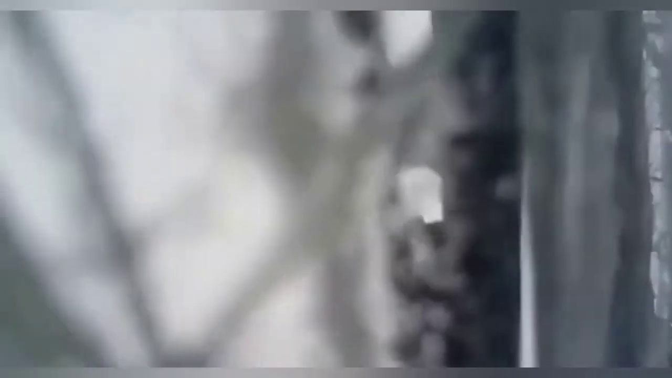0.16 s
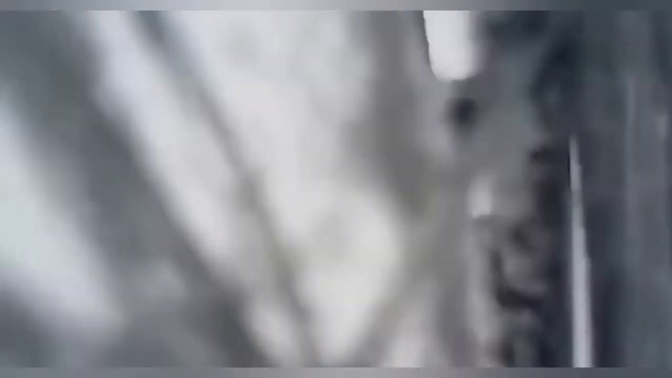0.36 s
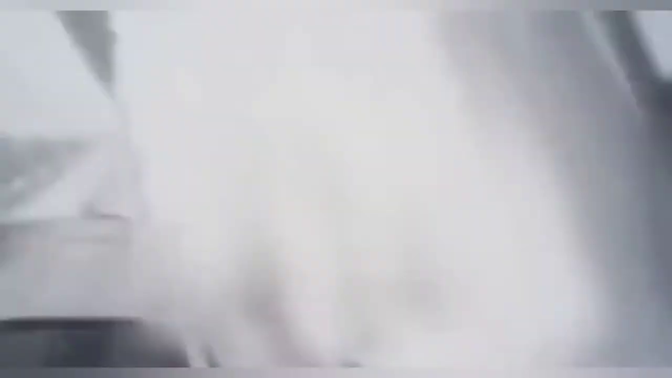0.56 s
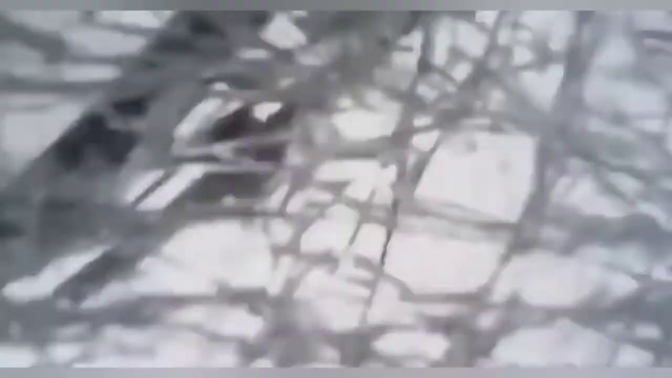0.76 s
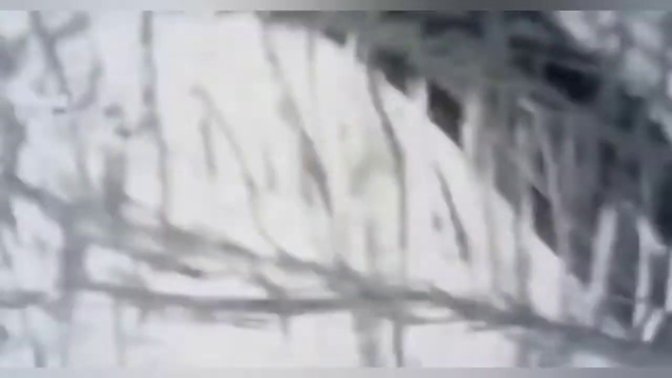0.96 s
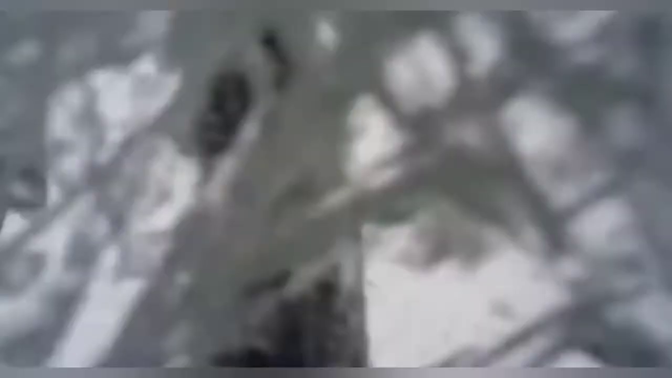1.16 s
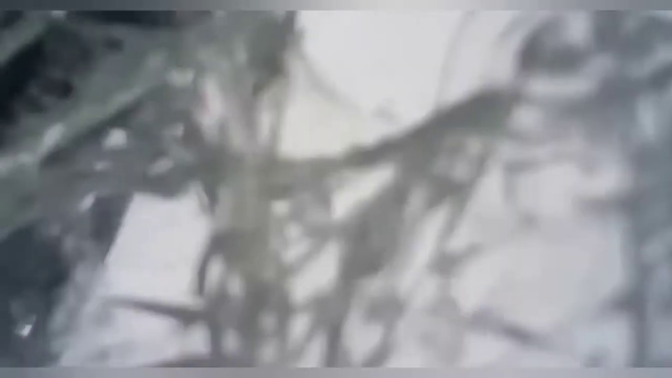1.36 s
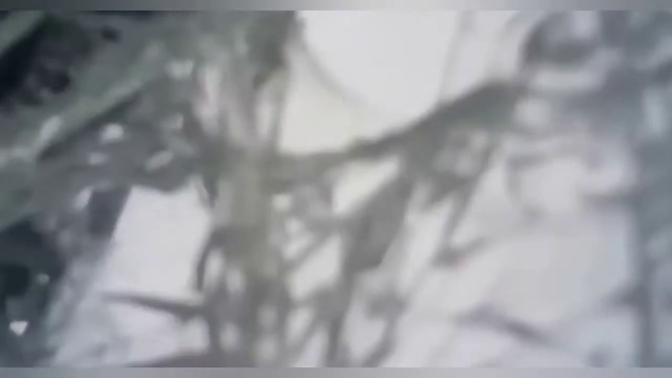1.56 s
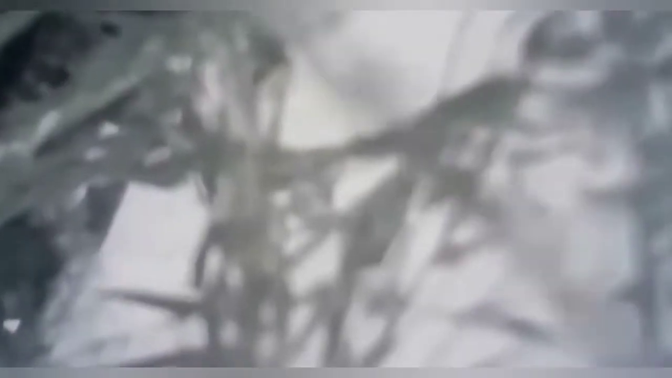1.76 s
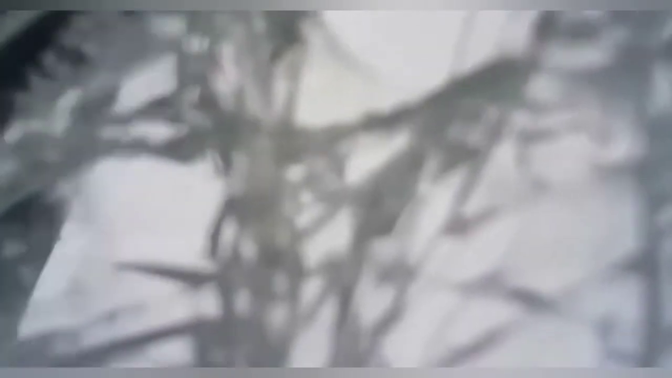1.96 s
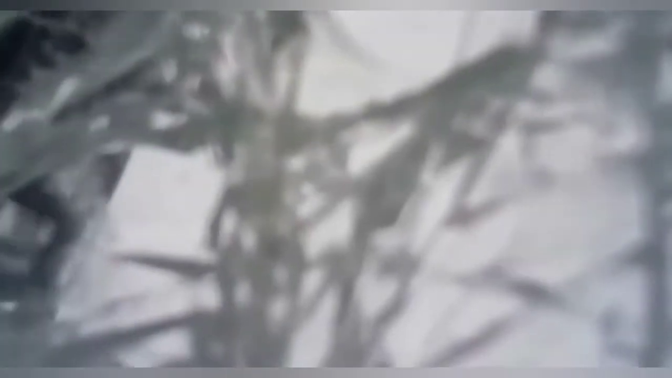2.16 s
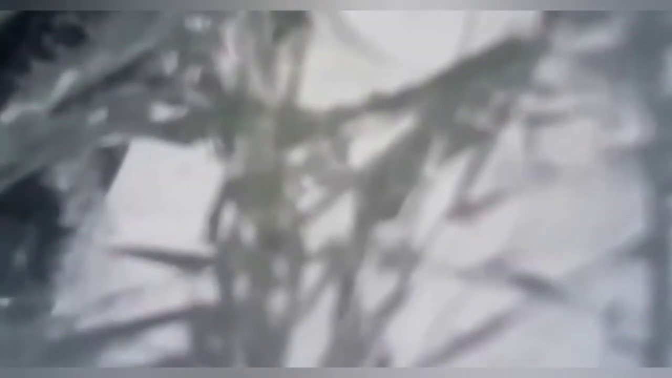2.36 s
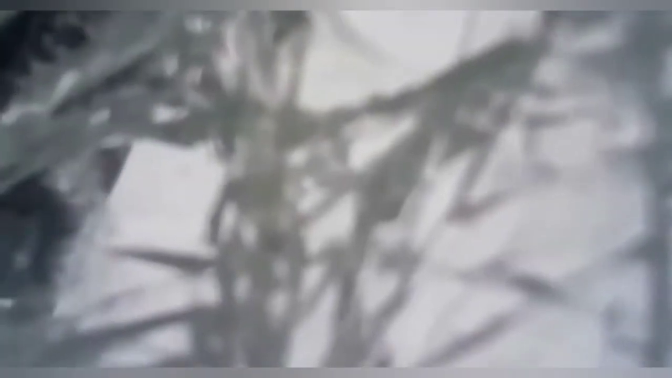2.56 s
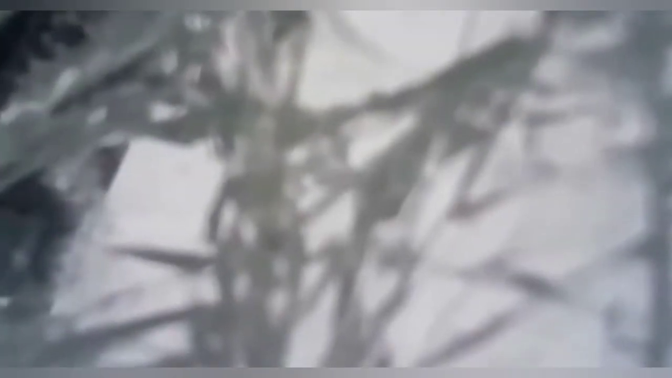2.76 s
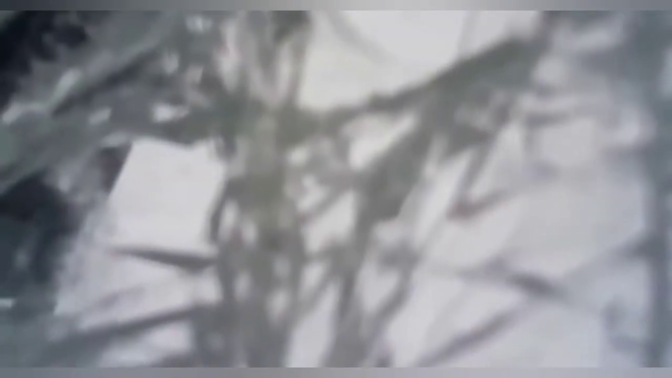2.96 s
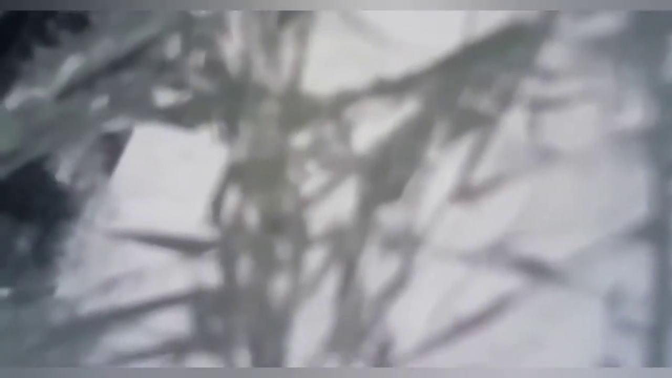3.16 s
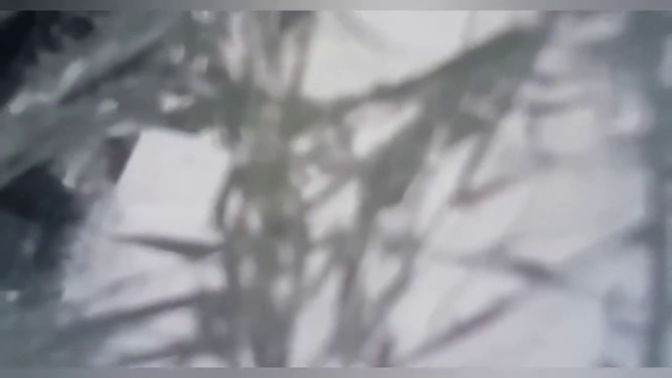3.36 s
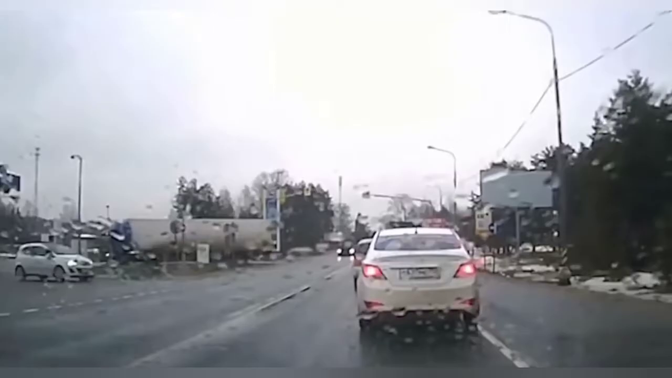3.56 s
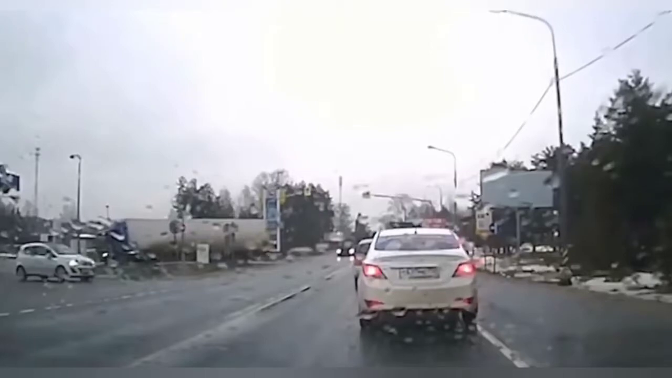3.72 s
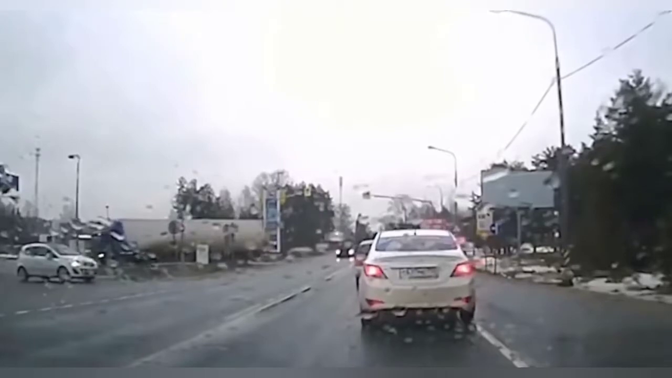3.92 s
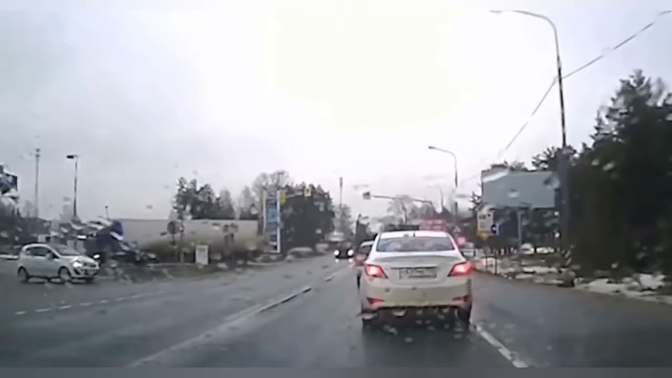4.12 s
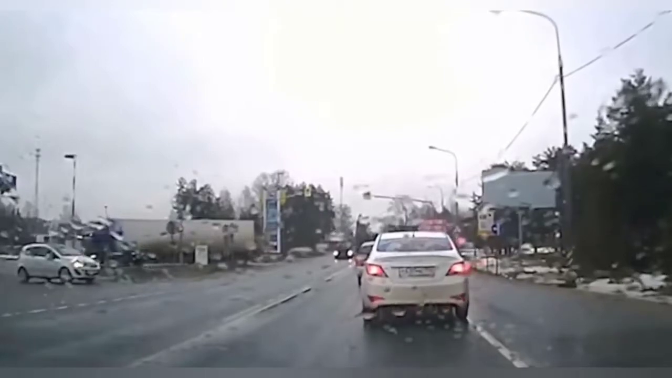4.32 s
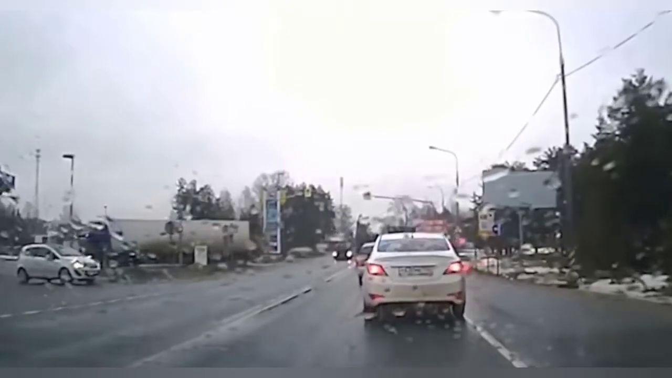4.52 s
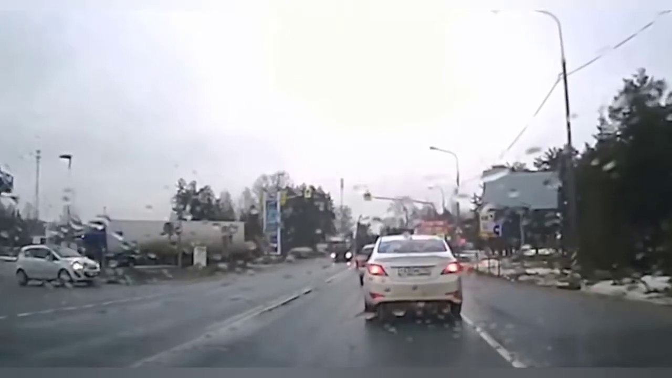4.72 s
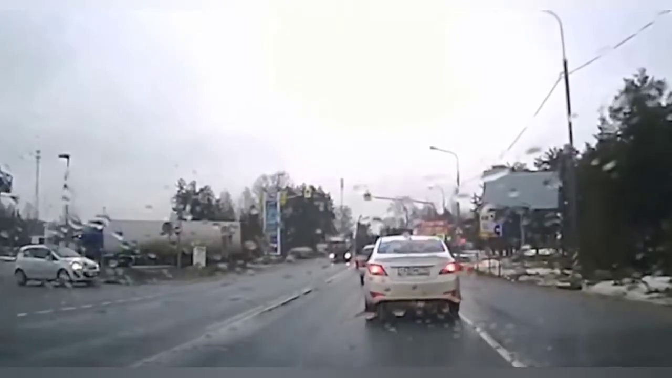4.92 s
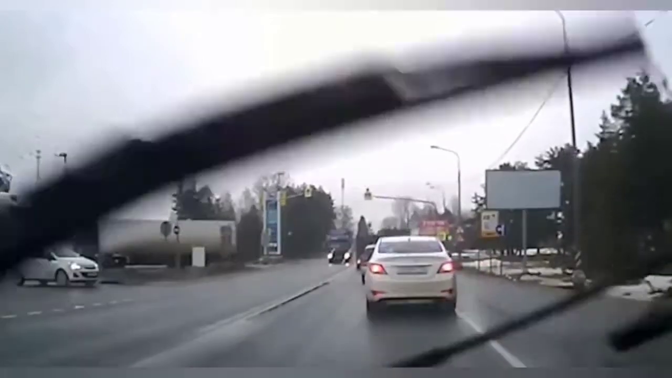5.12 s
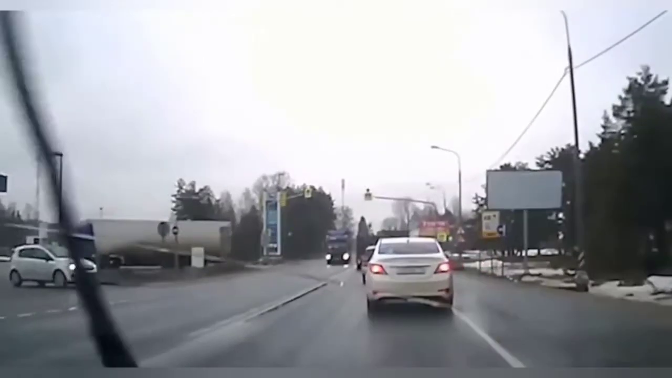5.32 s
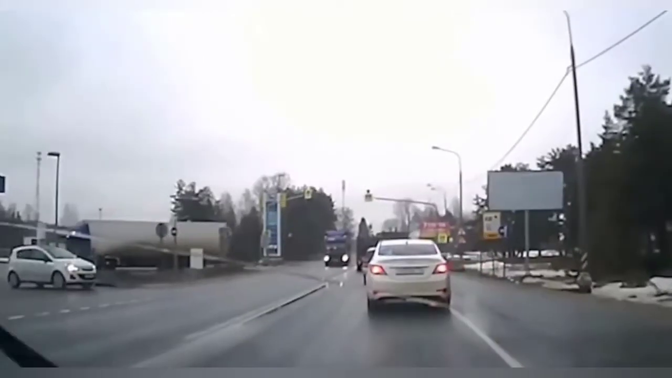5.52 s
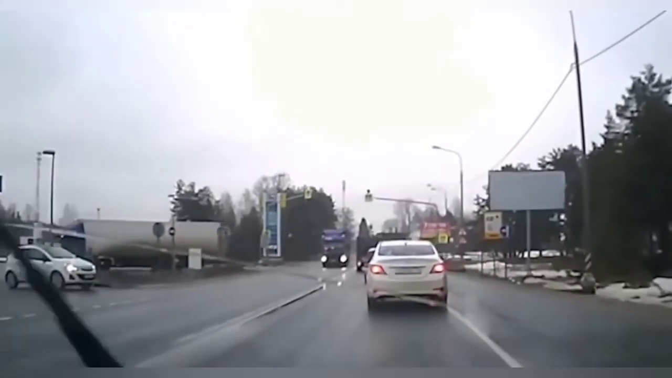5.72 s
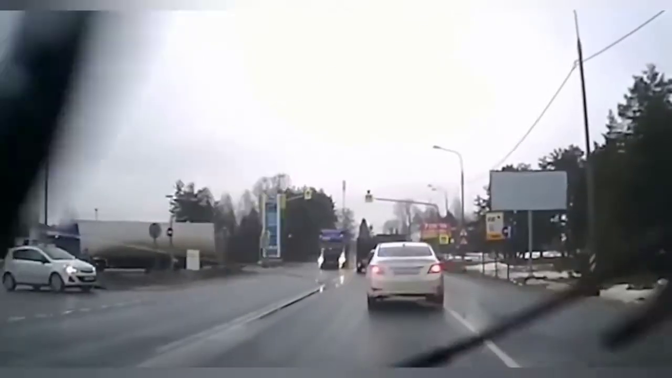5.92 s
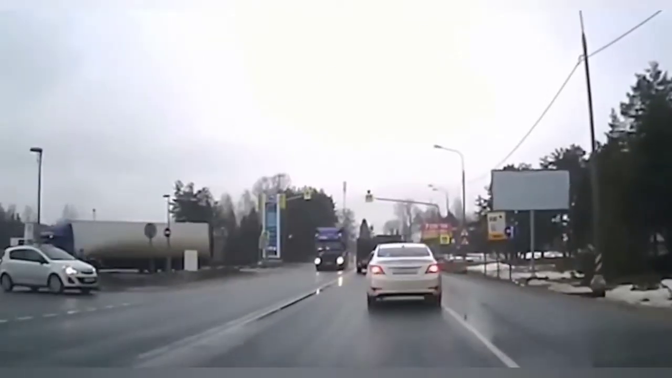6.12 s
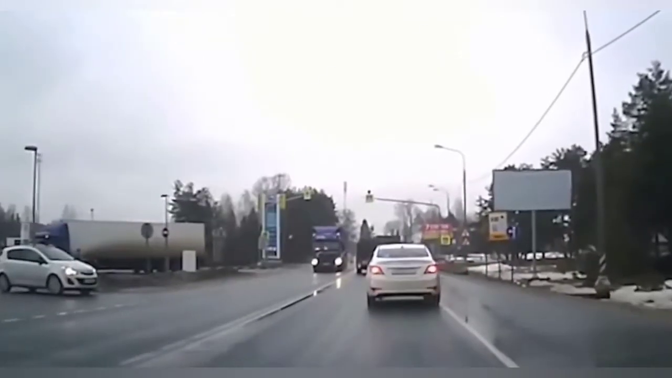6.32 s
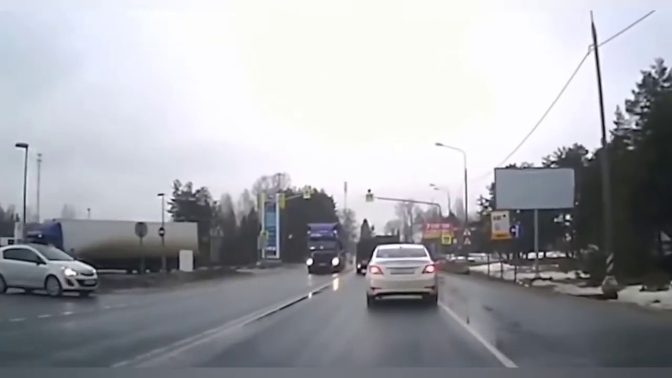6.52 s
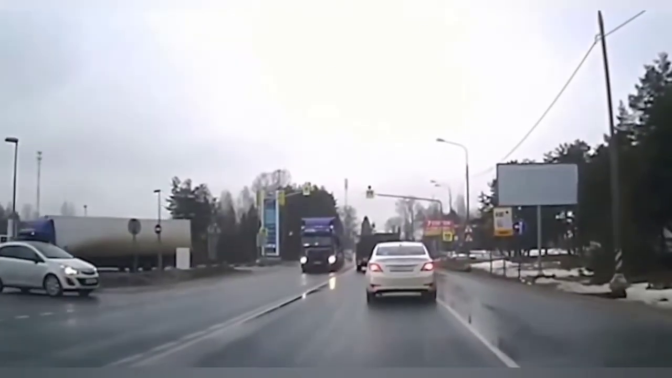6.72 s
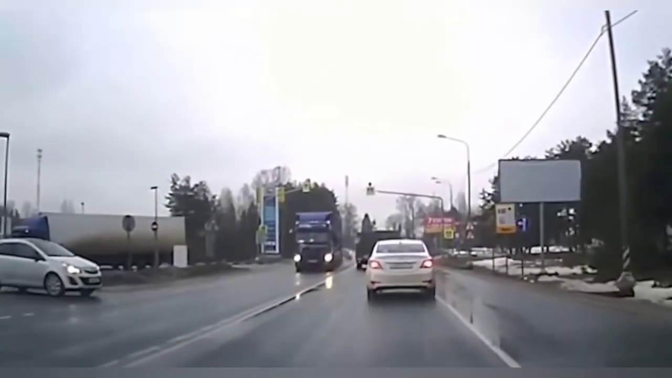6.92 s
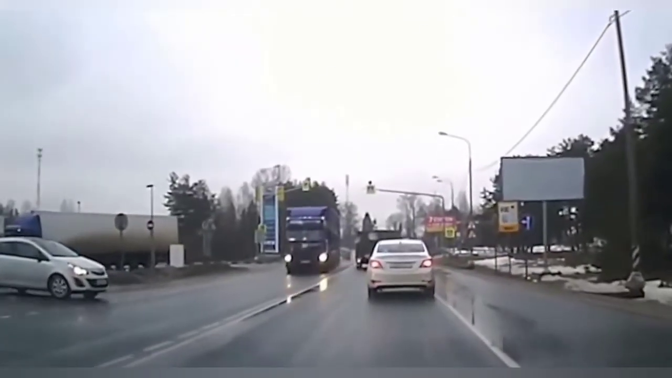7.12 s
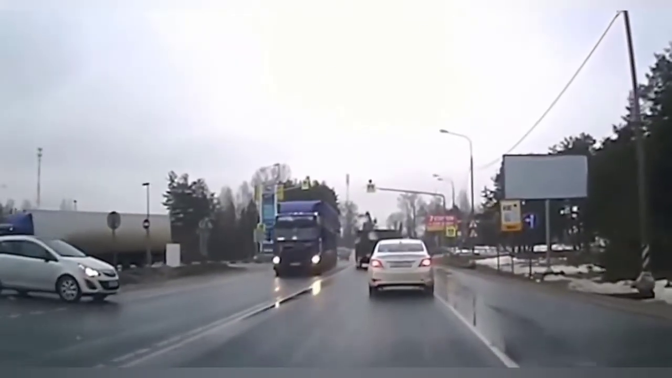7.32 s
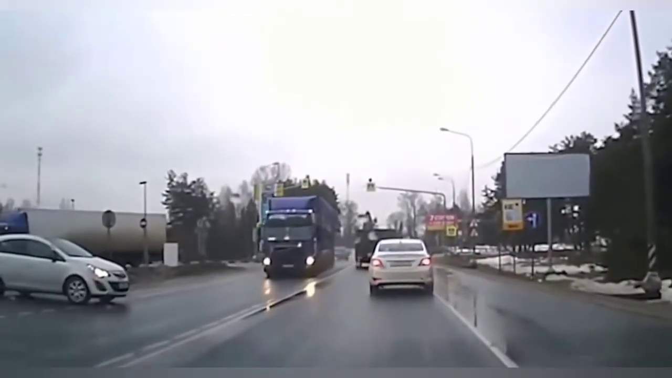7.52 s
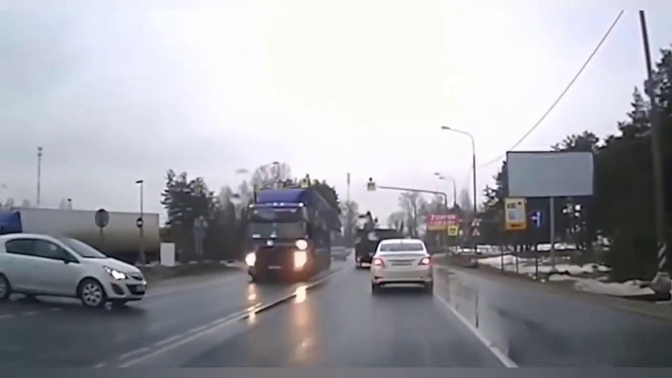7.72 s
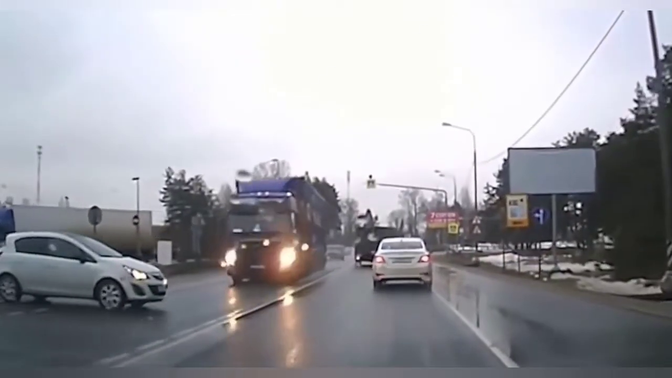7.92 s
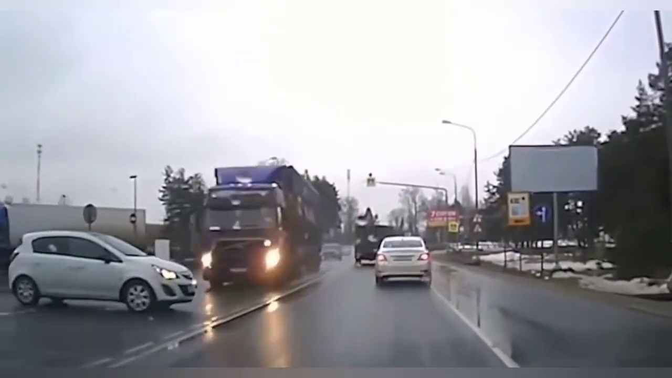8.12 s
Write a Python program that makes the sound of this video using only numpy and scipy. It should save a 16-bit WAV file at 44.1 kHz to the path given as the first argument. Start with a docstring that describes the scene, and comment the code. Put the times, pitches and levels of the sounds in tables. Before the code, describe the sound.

Branches snap and panels bang, then a violent, distorted car crash crunches and rattles, cuts off abruptly, leaving quiet low cabin rumble on a wet road.

```python
"""A car rolls into a roadside thicket, heard close from a small overloaded microphone on its windscreen:
blows ring resonant panels, low noise thuds, and snaps, crunch and grit stand for branches, glass and gravel.
The sound cuts off; inside another car creeping along a wet road, shaped noise fades in as body boom, road roar
and tyre hiss, with a gated chirr, small ticks, soft wiper swells, a gliding drip-like note and a short dropout."""
import sys
import numpy as np
from scipy import signal
from scipy.fft import rfft, irfft, next_fast_len
from scipy.io import wavfile
from scipy.ndimage import uniform_filter1d

SR = 44100
rng = np.random.default_rng(int(sys.argv[2]) if len(sys.argv) > 2 else 0)


def store_wav(level_fs):
    """Save 16-bit WAV to argv[1]."""
    pcm = np.round(np.clip(np.atleast_2d(level_fs), -1, 1) * 32767)
    wavfile.write(sys.argv[1], SR, pcm.T.astype(np.int16))


N = 360641
TIME = np.arange(N) / SR
CRASH = 4 * SR  # samples in which the battered panels and loose pieces sound


def gain_of(db):
    """dB to amplitude."""
    return 10 ** (np.asarray(db) / 20)


def evened(x):
    """Scales to rms 1."""
    return x / np.sqrt(np.mean(x ** 2) + 1e-20)


def columns(rows):
    """Curve columns at every sample."""
    s, *cols = np.transpose(rows)
    return [np.interp(TIME, s, c) for c in cols]


def add(mix, s, sound):
    """Mixes a sound in at time s."""
    part = mix[round(s * SR):][:len(sound)]
    part += sound[:len(part)]


def noise():
    """White noise for the whole length."""
    return rng.standard_normal(N)


def coloured(x, points):
    """Gives x the spectrum of a table, rms 1."""
    f, db = np.transpose(points)
    size = next_fast_len(N)
    hz = np.fft.rfftfreq(size, 1 / SR)
    shape_db = np.interp(np.log(hz + 1), np.log(f + 1), db)
    return evened(irfft(rfft(x, size) * gain_of(shape_db), size)[:N])


def band(x, hz, q):
    """A resonance applied twice for steep sides round hz, rms 1."""
    b, a = signal.iirpeak(hz, q, SR)
    return evened(signal.lfilter(b, a, signal.lfilter(b, a, x)))


def steadied(x, window_s):
    """Evens out the chance swells that last longer than the window."""
    return x / np.sqrt(uniform_filter1d(x ** 2, max(int(window_s * SR), 1)) + 0.0093)


def hail(per_s, spread_db, smear_s, wash):
    """Random blows of uneven size, each a short puff of noise, over a share of steady noise."""
    size = gain_of(spread_db * np.minimum(rng.exponential(1, N), 5))
    hits = size * (rng.random(N) < per_s / SR)
    puffs = signal.lfilter([1], [1, -np.exp(-1 / (smear_s * SR))], hits)
    return (evened(puffs) + wash) * noise()


def struck(rows, lift_db, rise_s, t60):
    """Envelopes of all events in a table: quick rise, steady fall in dB."""
    out, t = np.zeros(N), np.arange(SR // 4) / SR
    for s, db, *_ in rows:
        add(out, s, gain_of(db + lift_db - 60 * t / t60) * np.minimum(t / rise_s, 1))
    return out


# panel and cabin resonances: pitch_hz, width_hz (broadened below, as crumpled panels are), level_db
PANELS = [(254.7, 110, -10.5), (309, 46, -12), (393.5, 170, -3.5), (513.5, 100, -1), (633, 180, -4.5),
          (718.5, 110, -0.5), (841, 110, 1), (976, 198, 1.5), (1089.3, 150, -1.5), (1220, 190, -1)]
# level of the middle panels against the rest: start_s, level_db
MIDDLE = [(0, 0), (.35, -3.5), (.76, -6), (.8, -2.5), (.9, -10.5), (1.0, -5), (1.1, -3.5), (1.2, -3.5),
          (1.3, -2.5), (1.45, 0.5), (1.6, 3), (1.8, 3), (2.0, 1.5), (2.2, -0.5), (2.35, 2.5), (2.6, 3.5),
          (2.8, 2), (2.9, -0.5), (3.0, 2), (3.2, 0.5), (3.54, 1)]


def ringing_panels(lift_db):
    """Each panel resonates under its own blows and those all share; its pitch wanders as it bends."""
    widen, bend_spread, bend_s = 1.3, .025, .04
    shared = evened(hail(per_s=230.0, spread_db=2.5, smear_s=0.0055, wash=0.43))[:CRASH]
    (middle_db,), out = columns(MIDDLE), np.zeros(N)
    for hz, width, db in PANELS:
        own = evened(hail(per_s=28.0, spread_db=-1.5, smear_s=0.017, wash=1.0))[:CRASH]
        bend = np.interp(TIME[:CRASH] / bend_s, np.arange(200), rng.standard_normal(200))
        turn = np.exp(2j * np.pi * np.cumsum(hz * (1 + bend_spread * bend)) / SR)
        r = np.exp(-np.pi * widen * width / SR)
        # a resonator at 0 Hz, spun up to the moving pitch
        ring = (turn * signal.lfilter([1], [1, -2 * r, r * r], (shared + 1.6 * own) / turn)).real
        middle = np.exp(-(np.log2(hz / 740) / 0.32) ** 2)  # a bell over octaves round 740 Hz
        level_db = db + lift_db * np.log2(750 / hz) + middle_db * middle
        add(out, 0, gain_of(level_db[:CRASH]) * evened(ring))
    return evened(out) * np.sqrt(CRASH / N)  # rms 1 over the crash itself


# roar of the panels, up to, during and after the main blow: start_s, level_db,
# lift_db (per octave below 750 Hz)
ROAR = [
    [(0, -11.5, -5.5), (.024, -22.5, -5), (.042, -24, 1), (.066, -27, -6.5), (.105, -22.5, -4),
     (.125, -25.5, 1.5), (.192, -16, -6), (.197, -21.5, -1.5), (.282, -19, 4.5), (.314, -25.5, 1.5),
     (.36, -32, 6), (.41, -26.5, 4.5), (.6, -33.5, -0.5), (.7, -24, -5.5), (.767, -31, -2)],
    [(.771, -12, -3), (.8, -6.5, 3), (.83, -8.5, -2.5), (.88, -5.5, -7), (.91, -8.5, 1.5), (.95, -7, 1),
     (1.0, -12, 1.5), (1.05, -11, 6), (1.1, -12.5, 3.5), (1.19, -11.5, -4.5), (1.23, -15.5, 7),
     (1.28, -13, 3)],
    [(1.33, -11.5, 1), (1.43, -16.5, -0.5), (1.67, -17, 0.5), (1.69, -21.5, -2.5), (1.77, -14.5, -1),
     (1.82, -20.5, 2.5), (1.86, -16, 2), (1.97, -16.5, 1), (2.01, -8.5, 7), (2.02, -15, -2.5),
     (2.14, -17, 0.5), (2.15, -12, -4), (2.23, -25, 2.5), (2.25, -14.5, 3.5), (2.3, -22.5, -1.5),
     (2.41, -14, -1), (2.55, -19.5, 0.5), (2.57, -15, 0), (2.7, -20, 0), (2.71, -18.5, 1), (2.73, -19, -1),
     (2.78, -15.5, 1), (2.82, -25.5, 0.5), (2.84, -22, 2.5), (2.87, -24.5, 1.5), (2.99, -27.5, 1),
     (3.02, -26.5, -6.5), (3.04, -28, -1.5), (3.15, -20, 2), (3.32, -26.5, 3.5), (3.37, -25.5, 2.5),
     (3.42, -27.5, 3), (3.49, -24, -1), (3.54, -27, 0)],
]


def panel_roar():
    """The ringing panels follow the battering; each short blow stirs them up for a moment."""
    roar_db, lift_db = columns(np.concatenate(ROAR))
    battering = gain_of(roar_db) + struck(BLOWS, lift_db=-19.5, rise_s=0.014, t60=0.11)
    return battering * steadied(ringing_panels(lift_db), 0.044)


# spectrum of the thud: pitch_hz, density_db (per Hz, relative)
THUD = [(7.1, -34), (12, -3), (32, 6), (75, -12), (102, -2), (156, -4), (210, -7), (270, -33), (460, -120)]
# low thud of the body, up to, during and after the main blow: start_s, level_db
THUD_LEVEL = [
    [(0.0, -56), (0.06, -39), (0.486, -34), (0.532, -43.5), (.6, -41), (0.764, -38)],
    [(0.78, -26.5), (.87, -25), (.92, -17.5), (1.0, -24), (1.12, -21), (1.25, -24.5)],
    [(1.33, -29), (1.47, -36), (1.48, -28), (1.59, -39.5), (1.65, -28.5), (1.82, -44), (2.01, -38.5),
     (2.04, -46.5), (2.81, -42.5), (3.06, -53), (3.15, -39.5), (3.29, -42.5), (3.36, -57), (3.38, -43),
     (3.51, -46.5), (3.54, -41)],
]


def body_thud():
    """The heavy body moves as a whole: low noise with its slow swells evened out."""
    (thud_db,) = columns(np.concatenate(THUD_LEVEL))
    return gain_of(thud_db) * steadied(coloured(noise(), THUD), 0.044)


def fragments(low_hz, high_hz, t60, per_s, spread_db, level_db, points, count=56):
    """Pieces of many sizes, each struck at random and ringing on its own pitch."""
    t, out = np.arange(2048) / SR, np.zeros(N)
    size = gain_of(spread_db * np.minimum(rng.exponential(1, CRASH), 4))
    hits = size * (rng.random(CRASH) < per_s / SR)
    piece = rng.integers(0, count, CRASH)
    pitches = np.geomspace(low_hz, high_hz, count) * rng.uniform(1.0, 1.03, count)
    fall = gain_of(-60 * t / t60) * np.minimum(t / 0.00087, 1)
    for k, hz in enumerate(pitches):
        add(out, 0, signal.oaconvolve(hits * (piece == k), np.sin(2 * np.pi * hz * t) * fall))
    return gain_of(level_db) * coloured(out, points) * np.sqrt(CRASH / N)


# spectra of coarse crunch and fine grit: pitch_hz, density_db (per Hz, relative)
CRUNCH = [(880, -13), (1500, 1.5), (1630, -2), (1790, 0), (1890, -1), (2580, -6), (3310, -15), (3640, -9),
          (4500, -25.5), (5850, -50), (9900, -120)]
GRIT = [(2240, -10), (3800, -0.5), (5220, -5), (6450, -4.5), (9240, -19.5), (13000, -26), (14200, -43),
        (15500, -62.5)]
# loose debris: start_s, crunch_db, grit_db
DEBRIS = [
    [(0, -29, -40), (.06, -42, -52.5), (.095, -33, -50.5), (.14, -34.5, -46.5), (.165, -28, -38),
     (.2, -35, -45), (.25, -31.5, -41), (.305, -33, -47), (.322, -43, -62), (.356, -39.5, -57),
     (.375, -38, -47.5), (.435, -41, -58.5), (.46, -45, -59.5), (.485, -34, -43.5), (.505, -36.5, -39.5),
     (.522, -49, -62), (.59, -40.5, -52.5), (.615, -43.5, -45.5), (.632, -47, -70.5), (.655, -43.5, -49.5),
     (.68, -45, -67), (.7, -41.5, -53.5), (.754, -47, -59), (.766, -47.5, -55.5)],
    [(.773, -19.5, -27.5), (.81, -21.5, -25), (.87, -20.5, -20), (.93, -19, -22), (1.02, -23, -27),
     (1.07, -22.5, -24.5), (1.15, -23, -31), (1.19, -18.5, -24), (1.22, -22.5, -28.5), (1.27, -24, -32.5)],
    [(1.33, -26.5, -33.5), (1.49, -27, -34.5), (1.64, -33, -37), (1.99, -31, -40), (2.46, -33, -44),
     (2.76, -35.5, -50.5), (2.89, -38.5, -55.5), (3.36, -44.5, -60)],
    [(3.39, -45.5, -52.5), (3.44, -43.5, -56), (3.54, -40.5, -59)],
]


def debris():
    """Loose pieces rattle: puffs of noise plus ringing chips and shards; each snap sheds a shower of grit."""
    crunch_db, grit_db = columns(np.concatenate(DEBRIS))
    crunch = coloured(hail(per_s=190.0, spread_db=0.5, smear_s=0.0082, wash=0.5), CRUNCH)
    chips = fragments(low_hz=1499.5, high_hz=3804, t60=.025, per_s=497.5, spread_db=0, level_db=-3,
                      points=CRUNCH)
    grit = coloured(hail(per_s=640.0, spread_db=-1.0, smear_s=0.0019, wash=1.0), GRIT)
    shards = fragments(low_hz=3999, high_hz=11001.5, t60=.006, per_s=700, spread_db=3.5, level_db=-6,
                       points=GRIT)
    shower = struck(SNAPS, lift_db=-18, rise_s=0.0022, t60=.035)
    return gain_of(crunch_db) * (crunch + chips) + (gain_of(grit_db) + shower) * (grit + shards)


def snap(ring_hz, t60, knock_db, knock_hz, chance):
    """A crack of noise coloured round one ring, with a short knock of the panel behind it."""
    t = np.arange(len(chance)) / SR
    chance = chance + 2.6 * np.exp(-((t - .0018) / .00004) ** 2)  # the sharp edge of the break
    rise = np.minimum(t / 0.0015, 1) ** 2
    after = (t - .002).clip(0)
    crack = band(chance, ring_hz, 5.5) + 0.5 * band(chance, 3800.0, 0.91)
    crack = crack * gain_of(-60 * after / t60) * rise
    knock = band(chance[::-1], knock_hz, 1.6) * gain_of(-60 * after / .02) * rise
    return crack / abs(crack).max() + gain_of(knock_db) * knock / abs(knock).max()


# shards and twigs snapping: start_s, peak_db, ring_hz, knock_db (relative to the peak), knock_hz
SNAPS = [(0.043, -33.5, 6030, 8, 2058), (0.0706, -13.5, 5840, -2.5, 1566), (0.103, -30.5, 4200, 15, 1396),
         (0.1273, -28, 4263, 18, 2255), (0.149, -19.5, 3953, -5, 1400), (0.1712, -10, 7340, -11.5, 1730),
         (0.2359, -30.5, 5860, 6.5, 2220), (0.254, -22.5, 4503, 12, 1513), (0.287, -21, 4280, 7.5, 1420),
         (0.3057, -32, 4180, 4, 1435), (0.3345, -22.5, 4150, 2.5, 3410), (.341, -36, 7000, -6, 2500),
         (0.3667, -23.5, 4470, 3.5, 2165), (.374, -36, 6000, -2.5, 2466), (.380, -31.5, 4810, 0.5, 2500),
         (0.4, -33.5, 4050, 5.5, 2714), (.407, -34, 6500, -3.5, 2703), (.431, -38, 5000, -2, 2610),
         (0.4443, -18.5, 6110, -11, 1638), (0.4728, -11, 7200, -6, 2994), (0.488, -18.5, 4403, 1, 1949),
         (0.4993, -21.5, 5060, -11, 2086), (0.5274, -24.5, 6180, -14, 1398), (.553, -40, 5500, -3.5, 2300),
         (0.56, -29, 7780, -4.5, 2310), (0.576, -25, 4120, -3.5, 1524), (.589, -35.5, 5465, -3.5, 2444),
         (0.5956, -27, 6360, 1, 2514), (0.6068, -34, 4570, 5.5, 1450), (0.651, -31, 7300, -4.5, 1951),
         (0.688, -29.5, 4890, 7.5, 1397), (0.725, -33.5, 6060, -6, 1436), (0.7706, -22, 4440, 2.5, 1543),
         (1.0375, -23.5, 4810, -1, 1427), (1.061, -13, 4150, -6, 2230), (1.0977, -19, 4120, -1, 1600),
         (1.1142, -19.5, 4295, -1, 1438), (1.184, -16, 4270, -2, 2163), (1.2526, -20.5, 4364, -3, 1446),
         (1.4526, -22, 4566, -0.5, 1591), (1.4925, -15, 4100, 2.5, 2020), (1.503, -20.5, 9250, 0, 2172),
         (1.5285, -19, 6470, -6.5, 2118), (1.532, -14, 6440, -11, 2116), (1.5375, -18.5, 6400, -6, 2100),
         (1.559, -23, 5000, -1, 2000), (1.5865, -12, 4190, -9.5, 1655), (1.598, -20.5, 5363, -6, 1485),
         (1.633, -14, 4487, 0, 2806), (1.637, -18.5, 6500, -6, 2002), (1.6527, -13, 5940, -2, 2310),
         (1.667, -21.5, 4050, -5.5, 1422), (1.7345, -20.5, 3770, 0, 2000), (1.8726, -14.5, 6516, -16, 1414),
         (1.9647, -10, 7250, -14, 2048), (1.968, -16, 6480, -11, 2036), (2.006, -22.5, 4500, -3.5, 1417),
         (2.012, -16.5, 5500, -5.5, 2990), (2.0546, -25.5, 4170, 1, 1422), (2.125, -23.5, 4040, -2.5, 2160),
         (2.164, -25, 6320, -6.5, 1400), (2.22, -25.5, 6080, -3.5, 2272), (2.226, -26, 6334, -6, 2200),
         (2.2463, -26, 5610, -3, 1874), (2.3157, -13, 5783, -10.5, 1925), (2.3535, -23, 6490, -9.5, 2065),
         (2.36, -23, 7000, -8, 2030), (2.466, -28, 6400, 4, 1430), (2.496, -30, 4040, -0.5, 1430),
         (2.531, -25.5, 4444, 1.5, 1432), (2.542, -29, 5015, -2.5, 2000), (2.6424, -38.5, 3990, 5, 1418),
         (2.8335, -32, 6500, -8, 2567), (2.838, -29.5, 6430, 3.5, 3294), (2.846, -34.5, 5420, 6.5, 2403),
         (3.095, -40, 5600, 13.5, 1394), (3.1088, -38, 4370, 5, 1427), (3.1798, -29.5, 4225, -1, 1424),
         (3.2545, -39.5, 4200, 2.5, 1778), (3.3655, -41, 4980, 1, 1480), (3.382, -27, 5320, -7, 1738),
         (3.3975, -26.5, 6200, -3, 1700), (3.41, -37, 4500, -2, 1998), (3.415, -31, 4300, -3, 2003),
         (3.4265, -37, 7000, 1.5, 1994), (3.462, -37, 6100, 12, 1450), (3.4864, -41, 4000, 6, 1514),
         (3.5369, -40.5, 6010, 5, 1400)]


def snaps(rows, t60):
    """Small brittle breaks: every snap of one table at its own time."""
    out, chance = np.zeros(N), rng.standard_normal((len(rows), 2048))
    for (s, peak_db, ring_hz, knock_db, knock_hz), c in zip(rows, chance):
        add(out, s, gain_of(peak_db) * snap(ring_hz, t60, knock_db, knock_hz, c))
    return out


# short blows on the panels: start_s, peak_db, ring_hz
BLOWS = [(0.072, -9.5, 980), (0.127, -12.5, 1030), (0.17, -8.5, 850), (0.251, -10.5, 1312),
         (0.334, -23, 549), (0.365, -10.5, 1220), (0.471, -17.5, 1140), (0.488, -19, 1089),
         (0.582, -20, 1170), (.608, -12, 1040), (0.612, -14, 626.5), (1.493, -8.5, 689), (1.85, -14.5, 856),
         (1.999, -8.5, 786), (2.239, -20.5, 490), (2.839, -11, 720), (2.846, -12.5, 760),
         (2.853, -13.5, 960), (2.876, -12.5, 900), (3.014, -17.5, 927), (3.042, -17.5, 884),
         (3.344, -15.5, 860), (3.3672, -9.5, 950), (3.484, -14.5, 910)]


def blows():
    """Each blow is a sharp knock and a short dull ring of one panel."""
    out, t = np.zeros(N), np.arange(4096) / SR
    knock = 8.0 * np.exp(-((t - .001) / 0.00022) ** 2)
    fall = gain_of(-60 * t / 0.037) * np.minimum(t / .0015, 1)
    for s, peak_db, ring_hz in BLOWS:
        ring = band(rng.standard_normal(len(t)) * fall + knock, ring_hz, 2.6)
        add(out, s, gain_of(peak_db) * ring / abs(ring).max())
    return out


# drip-like notes, in the crash and in the drive: start_s, length_s, level_db (before a 5.5 dB lift),
# from_hz, to_hz, fade_db, beat_depth (0-1)
DRIPS = [(0.6084, 0.042, -20.5, 1356, 1940, -21.5, .15), (0.682, 0.032, -17, 938, 947, -7.5, 0.45),
         (0.717, 0.031, -26, 914, 895, -12, .3), (0.772, 0.0077, -16, 1035, 920, -19, .1),
         (6.76, .062, -38.5, 844, 857, -24, 0.1), (6.772, 0.044, -51.5, 890, 990, -3.5, .1)]


def drips():
    """Gliding tones that fade; they beat at 50 Hz and tremble at random."""
    out = np.zeros(N)
    for s, length_s, db, from_hz, to_hz, fade_db, beat in DRIPS:
        t = np.arange(0, length_s, 1 / SR)
        along = t / length_s
        pitch_hz = from_hz + (to_hz - from_hz) * np.sin(np.pi / 2 * along)
        tone = np.sin(2 * np.pi * np.cumsum(pitch_hz) / SR)
        swing = 1 + beat * np.cos(2 * np.pi * 50 * (t - 0.0092))
        tremble = signal.lfilter(*signal.butter(3, 300, fs=SR), rng.standard_normal(len(t)))
        swing = swing * (1 + .25 * evened(tremble))
        edges = np.minimum(t / .0015, 1) * np.minimum(8 * (1 - along), 1)
        add(out, s, gain_of(db + 5.5 + fade_db * along) * tone * swing * edges)
    return out


def pressure_jump():
    """Cabin pressure jumps at the main blow: the baseline is pushed down, held, then let go."""
    start_s, push, rise_s, end_s, fall_s = .772, -.27, .012, .985, .03
    rise = np.minimum((TIME - start_s).clip(0) / rise_s, 1)
    return push * rise * np.clip(1 - (TIME - end_s) / fall_s, 0, 1)


# spectrum of the electronic floor: pitch_hz, density_db (per Hz, relative)
AIR = [(2650, -25), (4500, 0.5), (5280, -0.5), (5620, -5.5), (6990, -6), (7670, -1.5), (8330, -7),
       (11500, -5), (13000, -7), (13700, -22), (15500, -31)]


def electronic_floor():
    """Steady treble noise, rms 1."""
    return coloured(noise(), AIR)


def cut_off(crash):
    """The crash is cut off with a short faint tail; very faint treble noise dies away after it."""
    cut_s = 3.5455
    since = (TIME - cut_s).clip(0)
    fade = np.where(TIME < cut_s, 1, gain_of(-17 - 60 * since / .069))
    faint_treble = (TIME > cut_s) * gain_of(-71.5 - 60 * since / .4) * electronic_floor()
    return crash * uniform_filter1d(fade, size=60) + faint_treble


def wreck():
    """Blows ring the panels, the body thuds, debris crunches and rattles; then the cut."""
    crash = panel_roar() + body_thud() + debris()
    crash = crash + snaps(SNAPS, t60=.011) + blows() + pressure_jump()
    return cut_off(crash)


# spectrum of the boom: pitch_hz, density_db (per Hz, relative)
BOOM = [(7.1, -35), (12, -11), (26, 2), (35, 6.5), (46, -4.5), (62, -1), (74, -6), (88, -15), (114, -20),
        (156, -38), (200, -33.5), (260, -43.5), (440, -120)]
# level of the boom in the cabin, before and after the dropout: start_s, level_db
BOOM_LEVEL = [
    [(3.65, -44), (3.71, -41.5), (3.77, -45.5), (3.82, -36.5), (3.94, -35.5), (3.98, -32.5), (4.19, -27),
     (4.46, -33.5), (4.66, -25.5), (4.75, -33.5), (5.01, -29.5), (5.21, -35.5), (5.31, -26.5),
     (5.43, -31.5), (5.53, -28.5), (5.55, -31), (5.9, -26), (5.96, -29.5), (6.76, -29.5), (7.0, -35),
     (7.08, -29.5), (7.3, -37)],
    [(7.365, -30.5), (7.473, -27), (7.941, -32.5), (7.953, -29.5), (8.149, -26.5), (8.178, -40)],
]


def body_boom():
    """The car body booms: swaying low noise."""
    (boom_db,) = columns(np.concatenate(BOOM_LEVEL))
    return gain_of(boom_db) * steadied(coloured(noise(), BOOM), 0.47)


# spectra of road roar and of tyre and wiper hiss: pitch_hz, density_db (per Hz, relative)
ROAD = [(53, -36), (90, -21), (113, -11.5), (161, -11), (233, -16), (379, -22), (422, -27.5), (525, -23.5),
        (585, -29), (832, -26.5), (940, -28), (1390, -32), (1930, -47.5), (2300, -76), (2990, -59),
        (5060, -120)]
HISS = [(1060, -11.5), (1800, -8.5), (2110, -8.5), (3120, -4), (3540, -7.5), (3840, -9.5), (4250, -12),
        (5000, -30), (6500, -30), (11000, -120)]
# the wet road heard from the cabin, before and after the dropout: start_s, roar_db, hiss_db
ROAD_LEVEL = [
    [(3.65, -65.5, -89), (3.8, -60, -84.5), (3.93, -57.5, -80), (4.13, -53, -74), (4.3, -52.5, -73.5),
     (4.56, -53, -76), (4.87, -51.5, -75.5), (5.2, -53, -73.5), (5.66, -54, -77.5), (5.85, -52.5, -73),
     (6.11, -51, -68.5), (6.32, -53, -74.5), (6.7, -54, -72), (6.83, -54.5, -75), (7.3, -54, -79)],
    [(7.42, -47, -70), (7.556, -48.5, -71.5), (7.616, -47, -69.5), (7.94, -49, -68), (8.15, -49, -65.5)],
]


def wet_road():
    """Road roar in slow uneven puffs, and tyre and wiper hiss in quicker ones, over steady noise."""
    road_db, hiss_db = columns(np.concatenate(ROAD_LEVEL))
    road = coloured(hail(per_s=16.0, spread_db=1.5, smear_s=0.028, wash=4.4), ROAD)
    hiss = coloured(hail(per_s=100., spread_db=0.0, smear_s=0.019, wash=2.8), HISS)
    return gain_of(road_db) * road + gain_of(hiss_db) * hiss


# a faint electronic chirr, switched on and off: start_s, end_s, period_s, share_on (0-1), level_db
CHIRR = [(4.619, 5.528, 0.074, 0.52, -83), (6.806, 7.303, 0.028, 0.47, -82.5),
         (7.49, 8.18, 0.047, 0.71, -83.5)]


def chirr():
    """Short bursts of a thin whine over a band of fuzz."""
    whine = np.sin(2 * np.pi * 7300 * TIME) + 0.93 * band(noise(), 6600, 8.5)
    gate = np.zeros(N)
    for start_s, end_s, period_s, share, db in CHIRR:
        burst = (TIME - start_s) / period_s % 1 < share
        gate += gain_of(db) * (TIME > start_s) * (TIME < end_s) * burst
    return whine * uniform_filter1d(gate, size=100)


# small ticks in the cabin: start_s, peak_db, ring_hz, knock_db (relative to the peak), knock_hz
TICKS = [(4.8239, -62, 3000, 12, 700), (6.7605, -57, 3180, 8, 1470), (7.9204, -46, 3270, 6, 825)]


def ticks():
    """Small snaps with the treble taken off."""
    return signal.lfilter(*signal.butter(6, 4800., fs=SR), snaps(TICKS, t60=0.016))


# soft wiper thumps and sweeps: start_s, level_db, centre_hz, sharpness (Q), length_s
WIPER = [(4.943, -49, 286, 1.9, 0.11), (5.323, -51, 250, 1.6, 0.0304), (6.035, -44.5, 171.4, 1.3, 0.064),
         (6.099, -61, 1270, 3.8, 0.27)]


def wipers():
    """Soft swells of noise round one pitch."""
    out = np.zeros(N)
    for s, db, hz, sharpness, length_s in WIPER:
        rub = band(rng.standard_normal(SR // 3), hz, sharpness)[:int(length_s * SR)]
        add(out, s, gain_of(db) * rub * np.hanning(len(rub)))
    return out


# spans of the drive, with the dropout between them: start_s, end_s
HEARD = [(3.651, 7.303), (7.363, 8.2)]


def drive():
    """Boom, wet road, floor and chirr sound only within their spans; ticks and wipers lie on top."""
    cabin = body_boom() + wet_road() + gain_of(-83.5) * electronic_floor() + chirr()
    on = sum((TIME > a) * (TIME < b) * 1. for a, b in HEARD)
    return cabin * uniform_filter1d(on, size=300) + ticks() + wipers()


def scene():
    """The crash, then the drive, with drip-like notes in both."""
    return (wreck() + drive() + drips())[None]


# upper headroom of the microphone sags under the main blow and recovers: start_s, ceiling (amplitude)
CEILING_UP = [(0, .27), (.769, .27), (.772, .19), (1.25, .19), (1.6, .3)]


def record(dry):
    """Uneven saturation, a coupling capacitor's baseline drift, presence lift, slow gain control, band limit."""
    ceiling_down, knee = .35, 6  # amplitude; hardness of the saturation
    ceiling = np.where(dry > 0, columns(CEILING_UP)[0], ceiling_down)
    squashed = dry / (1 + (abs(dry) / ceiling) ** knee) ** (1 / knee)
    coupled = signal.lfilter(*signal.butter(1, 8., "high", fs=SR), squashed)
    coupled = coupled + 0.12 * band(coupled, 2500.0, 1.) * np.std(coupled)
    keep = np.exp(-1 / (.3 * SR))
    power = signal.lfilter([1 - keep], [1, -keep], squashed ** 2)  # long loud stretches turn the gain down
    ducked = coupled / (1 + 6.9 * power) + .0012  # a small constant offset
    dulled = signal.lfilter(*signal.butter(4, 13600., fs=SR), ducked)
    taps = signal.firwin(511, 15700, window=("kaiser", 9), fs=SR)
    return signal.oaconvolve(dulled, taps[None], "same")


dry = scene()
out = record(dry)
store_wav(out)
```